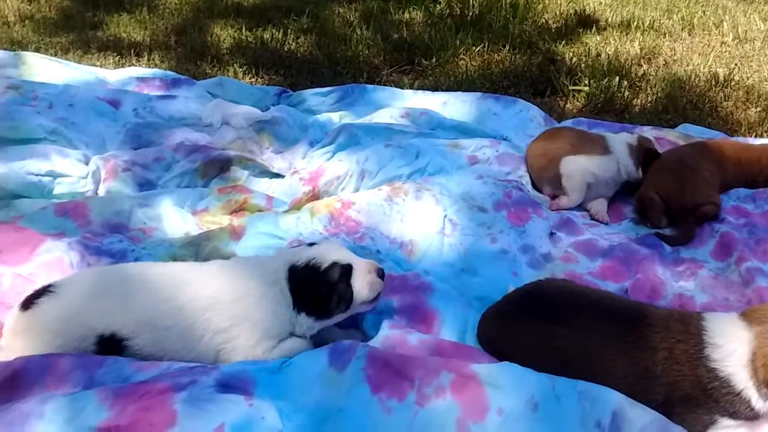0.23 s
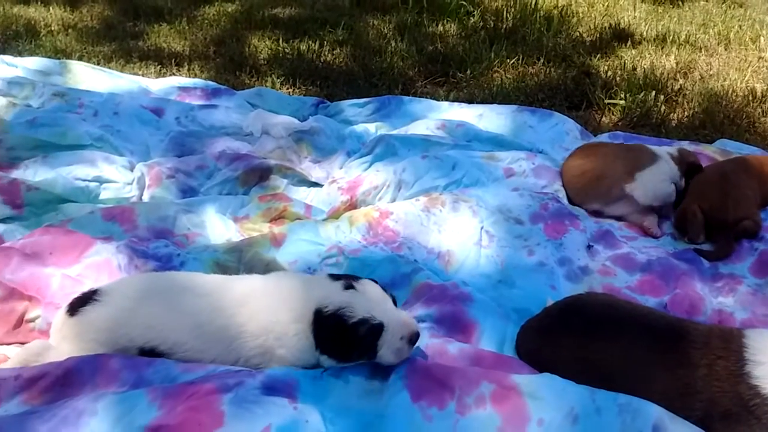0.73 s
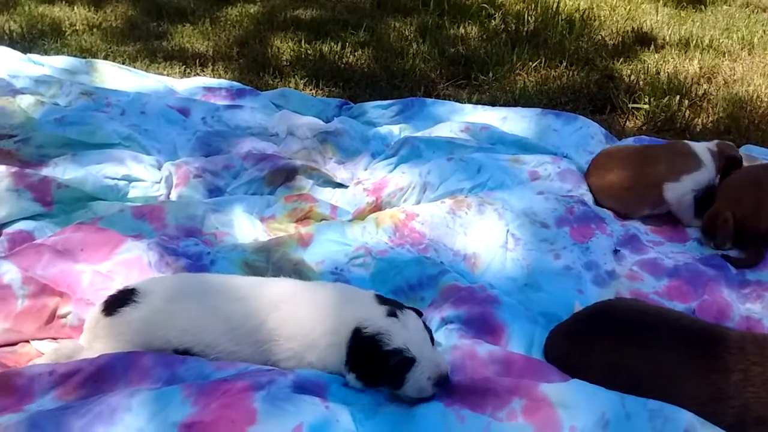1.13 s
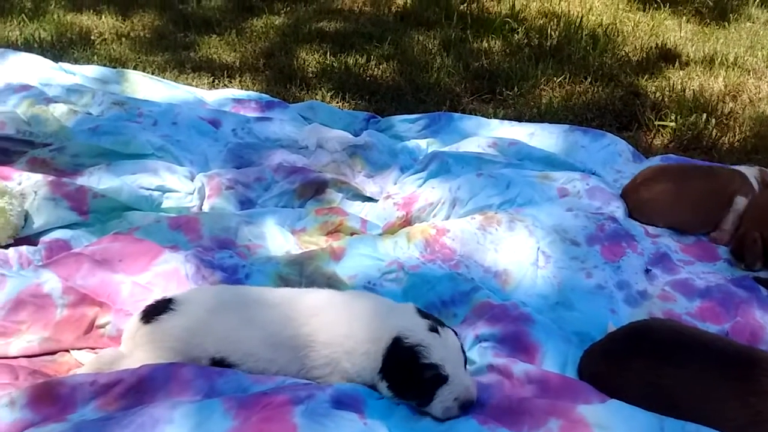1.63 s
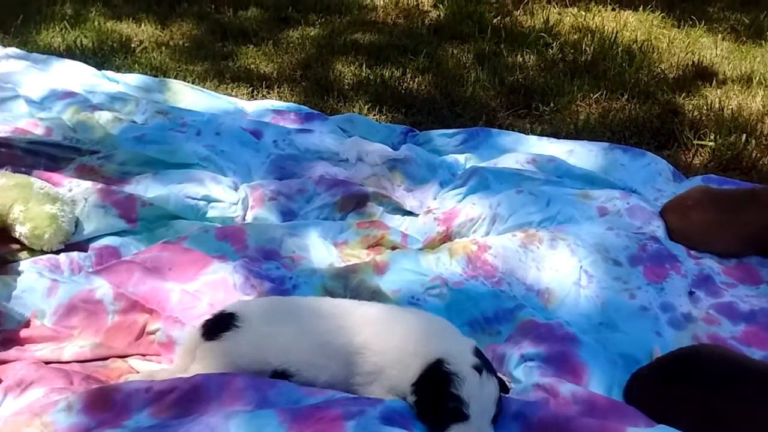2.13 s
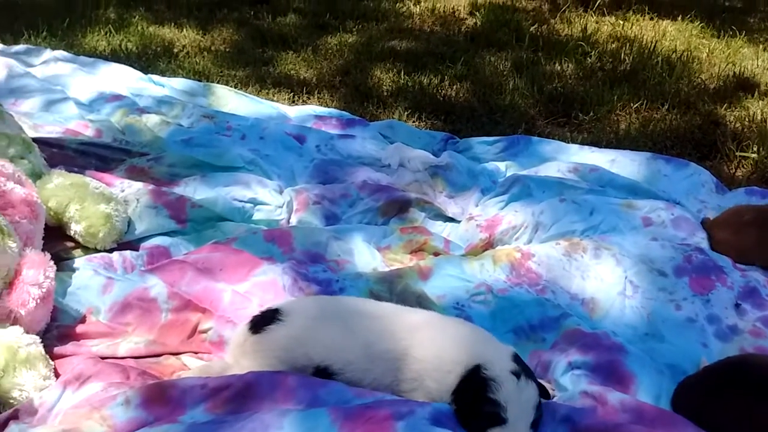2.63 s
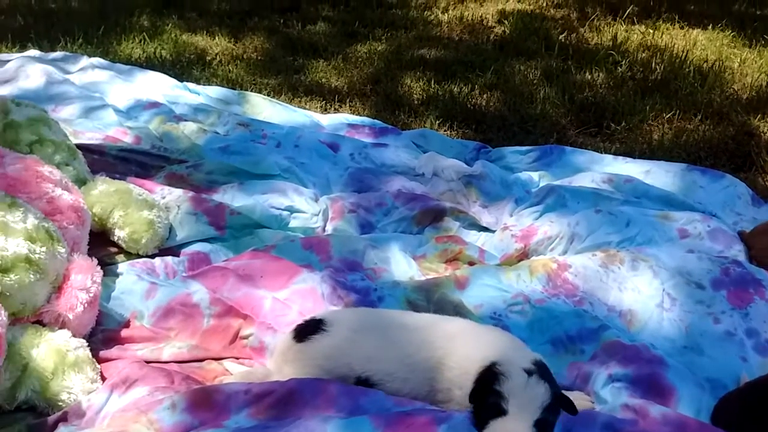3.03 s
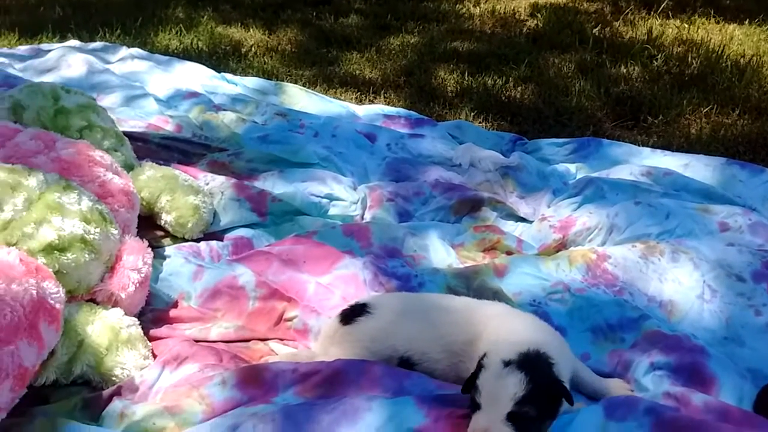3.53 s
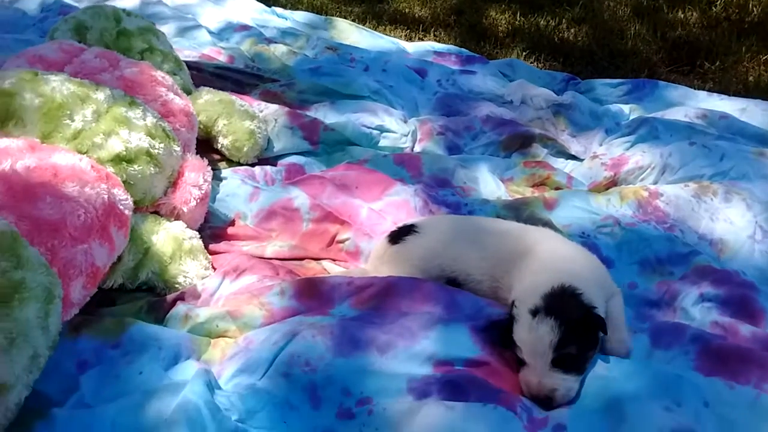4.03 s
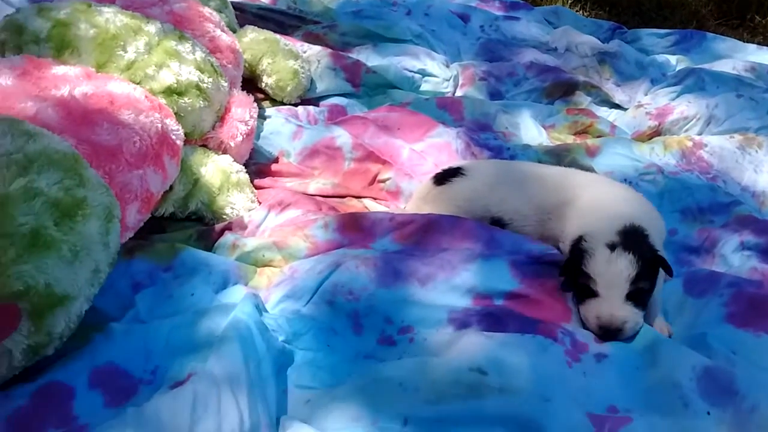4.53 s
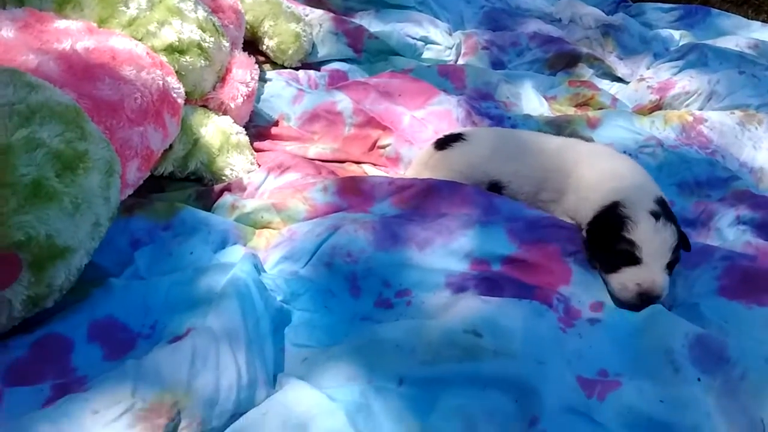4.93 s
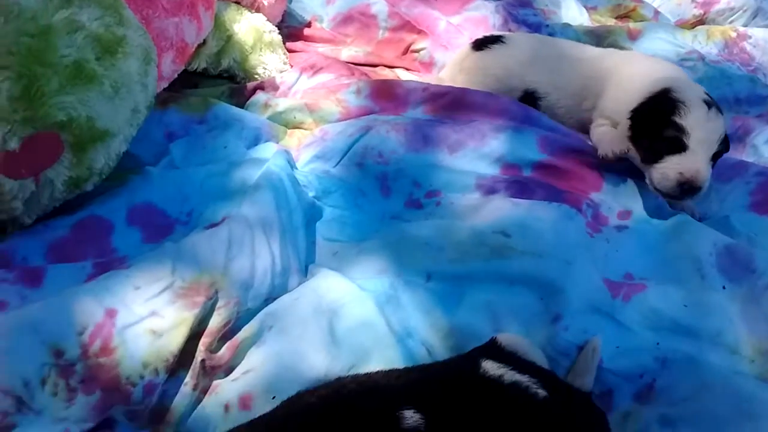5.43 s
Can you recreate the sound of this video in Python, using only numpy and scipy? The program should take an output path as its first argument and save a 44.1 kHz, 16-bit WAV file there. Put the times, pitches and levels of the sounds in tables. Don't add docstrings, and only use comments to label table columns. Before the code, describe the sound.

Overlapping puppy cries in a garden, near and dry with only dull faint echoes. High yelps fade out early; smooth falling howls repeat to the end, joined by yodelling squeals that break in pitch, brief nasal whines, low grunts and a few tiny lip smacks. Soft lumpy wind pushes on the stereo microphone over a quiet leafy hiss.

```python
import sys
import numpy as np
from scipy import signal
from scipy.fft import rfft, irfft, next_fast_len
from scipy.io import wavfile

SR = 44100
rng = np.random.default_rng(int(sys.argv[2]) if len(sys.argv) > 2 else 0)


def decibels_to_gain(level_db):
    exponent = np.asarray(level_db, float) / 20
    return 10 ** exponent


def put_to_file(sound):
    columns = np.atleast_2d(sound).T
    safe = np.clip(columns, -1, 1)
    whole_steps = np.round(safe * 32767)
    wavfile.write(sys.argv[1], SR, whole_steps.astype(np.int16))


N = 250047


def at_hz(points, hz, column=1):
    points = np.array(points, float)
    return np.interp(np.log(np.maximum(hz, 1)), np.log(points[:, 0]), points[:, column])


def coloured(points):
    size = next_fast_len(N)
    gain = decibels_to_gain(at_hz(points, np.fft.rfftfreq(size, 1 / SR)))
    noise = irfft(rfft(rng.standard_normal(size)) * gain, size)[:N]
    return noise / np.std(noise)


def drift(rate_hz):
    low_pass = signal.butter(2, rate_hz, fs=SR, output="sos")
    slow = signal.sosfilt(low_pass, rng.standard_normal(N + SR))[SR:]
    return slow / np.std(slow)


# frequency [Hz], density [dB per Hz].
HISS_COLOUR = [(100, -37.5), (350, -3.5), (1800, 15.5), (6200, -11), (8000, -3.5), (12500, -8),
               (13800, -10.5), (15000, -7)]
HISS_DB = -57.5


def hiss():
    shared = coloured(HISS_COLOUR)
    own = np.array([coloured(HISS_COLOUR), coloured(HISS_COLOUR)])
    balance = decibels_to_gain([[1.5], [-1.5]])
    return decibels_to_gain(HISS_DB + 1.6 * drift(7.6)) * (0.26 * shared + 1.82 * own) * balance


# peak in seconds [s], level [dB].
WIND = [(0.0, -46.5), (1.498, -41), (2.0, -50.5), (4.12, -56.5), (5.551, -45), (0.847, -41.5), (2.298, -34),
        (3.06, -44), (4.449, -49.5), (5.251, -39.5)]
# frequency [Hz], density [dB per Hz].
WIND_COLOUR = [(20, -35.5), (110, -5), (230, -9), (330, -20.5), (700, -2), (8000, -46)]
CALM_DB, GUST_S = -48.5, 0.16


def wind():
    time = np.arange(N) / SR
    gusts = decibels_to_gain(CALM_DB) + sum(decibels_to_gain(db) * np.exp(-((time - s) / GUST_S) ** 2) for s, db in WIND)
    opposite = np.array([[1], [-1]])
    lumpy = gusts * decibels_to_gain(2.4 * drift(4.2)) * coloured(WIND_COLOUR)
    sway = decibels_to_gain(0.89 * drift(2.0) * opposite)
    shared = 0.088 * gusts * coloured(WIND_COLOUR)
    return lumpy * sway * opposite + shared


def garden(x):
    dull = signal.sosfilt(signal.butter(2, 3000, fs=SR, output="sos"), x)
    out = np.zeros_like(x)
    for lag_s, db in [(.017, -27.5), (.043, -28.5)]:
        lag = int(lag_s * SR)
        out[:, lag:] += decibels_to_gain(db) * dull[::-1, :-lag]
    return out


# frequency [Hz], phase by which left leads [rad], left over right [dB].
FRONT = [(336, 3, 1.4), (505, 3.5, -1), (798, 3.5, 8), (813, 5, 17.5), (920, -0.03, 6.5), (1182, 1.45, 6),
         (1678, 0, -2.5), (2196, -2, -6.5), (3260, -2, 2.5), (3300, -2.5, 0.5), (5430, 0.24, 3.5),
         (8900, 0.5, 1), (14900, -6, 0)]
FLANK = [(400, 3.14, 0.5), (815, 3.45, 1.1), (1360, 4, 0.67), (2064, 4.36, 1.9), (3050, 3.26, 3.9),
         (4640, 2.05, 0.89), (15250, 5.94, 2.2)]
BEHIND = [(550, -4.5, -14.5), (820, -1.5, -1.5), (2157, 0.36, 3.5), (3390, 4, 4.5), (3330, 3.5, 6),
          (8000, 9, 2.5), (15000, 11, 2.5)]


def ports(x, direction):
    size = next_fast_len(N + SR // 10)
    hz, spectrum = np.fft.rfftfreq(size, 1 / SR), rfft(x, size)
    turn = np.exp(.5j * at_hz(direction, hz))
    ratio = decibels_to_gain(at_hz(direction, hz, column=2))
    right = np.sqrt(2 / (1 + ratio ** 2))
    return irfft([spectrum * ratio * right * turn, spectrum * right / turn], size)[:, :N]


# frequency [Hz], level [dB].
THROAT = [(250, -46), (400, -23.5), (900, 8.5), (1600, 19), (2050, 13), (2500, 3.5), (3200, 1),
          (4500, -12.5), (5300, -24.5), (6200, -40.5), (7600, -15.5), (8600, -13.5), (9400, -32),
          (10400, -25.5), (13800, -55.5), (15200, -33.5)]
# time in seconds [s], level [dB].
SMACKS = [(1.233, -30), (1.326, -33), (3.047, -40), (3.09, -40), (2.826, -32)]
SMACK_S = .0015


def smacks():
    time = np.arange(N) / SR
    puffs = sum(decibels_to_gain(db) * np.exp(-((time - s) / SMACK_S) ** 2) for s, db in SMACKS)
    return puffs * signal.lfilter([1, -.7], [1], coloured(THROAT)) * 1.8


def glide(t, s, value):
    slope = np.diff(value) / np.diff(s)
    inner = 2 * np.maximum(slope[1:] * slope[:-1], 0) / (slope[1:] + slope[:-1] + 1e-9)
    tangent = np.r_[slope[0], inner, slope[-1]]
    k = np.clip(np.searchsorted(s, t) - 1, 0, len(s) - 2)
    step = np.diff(s)[k]
    u = (t - s[k]) / step
    bend = (1 - u) * (tangent[k] - slope[k]) - u * (tangent[k + 1] - slope[k])
    return value[k] + step * u * (slope[k] + (1 - u) * bend)


THROAT_TOP_DB, MOUTH_RANGE_DB = 22, 42
RING_WIDTH_OCTAVES, DIP_HZ, DIP_WIDTH_OCTAVES = 0.26, 3050, 0.18
RISE_DB_PER_OCTAVE_S, RISE_TOP_DB = 4, 10.5
JUMP_S = .012
OVERTONE_ONSET_S = 0.03
RASP_DB, RASP_HZ = 19, 6800
BREATH_DB, BREAK_BREATH_DB = -34, 22


def puppy(melodies, mouths, hums, breaks, wobble, edge_s, tilt_db, first_db, upper_db, ringing, dip_db):
    time, voice, phase = np.arange(N) / SR, np.zeros(N), [0]
    starts, ends = {m[0][0] for m in melodies}, {m[-1][0] for m in melodies}
    rough = np.zeros(N)
    for a, b, depth in breaks:
        rough += depth * np.clip(np.minimum(time - a, b - time) / 0.0013, 0, 1)
    unsteady = 1 + wobble * drift(45) + .06 * rough * drift(250)
    shimmer = decibels_to_gain(0.5 * drift(45)) * (1 + rough * drift(230))
    breath, flicker = coloured(THROAT), drift(13.0)
    high_pass = signal.butter(4, RASP_HZ, "high", fs=SR, output="sos")
    breath = breath + decibels_to_gain(RASP_DB) * signal.sosfilt(high_pass, breath)
    air = decibels_to_gain(BREATH_DB + BREAK_BREATH_DB * rough) * breath

    for melody, mouth, hum_db in zip(melodies, mouths, hums):
        s, pitch = np.transpose(melody)
        span = slice(int(max(s[0], 0) * SR), min(int(s[-1] * SR), N))
        t = time[span]
        runs_on, continues = s[0] in ends, s[-1] in starts
        melody_hz = glide(t, s, pitch)
        hz = melody_hz * unsteady[span]
        order = np.arange(1, int(15000 / pitch.max()) + 1)[:, None]
        overtone_hz = order * hz

        at, db = np.transpose(mouth)
        open_db = glide(np.clip(t, at[0], at[-1]), at, db) - THROAT_TOP_DB
        octaves = np.maximum(np.log2(overtone_hz / 2000), 0) * (overtone_hz < 6500)
        sample = span.start + np.arange(len(t))
        uneven = 4.8 * flicker[(sample + 5000 * order) % N]
        gains = decibels_to_gain(at_hz(THROAT, overtone_hz) + tilt_db * octaves + uneven * (order > 3) + open_db)

        ring = 0
        for at, reach, ring_hz, db in ringing:
            if s[0] < at < s[-1]:
                away = np.log2(overtone_hz / ring_hz) / RING_WIDTH_OCTAVES
                ring = ring + db * np.exp(-((t - at) / reach) ** 2 - away ** 2)
        dip = dip_db * np.exp(-(np.log2(overtone_hz / DIP_HZ) / DIP_WIDTH_OCTAVES) ** 2)
        gains[1:] *= decibels_to_gain(ring + dip)[1:]

        climb = RISE_DB_PER_OCTAVE_S * np.gradient(np.log2(melody_hz)) * SR
        climb = np.clip(climb, 0, RISE_TOP_DB)
        jumped = any(0 <= s[0] - end < JUMP_S for end in ends)
        onset = np.clip((t - s[0] + jumped) / OVERTONE_ONSET_S, .25, 1)
        gains[2:] *= decibels_to_gain(upper_db + climb / (1 + runs_on)) * onset

        hum = decibels_to_gain(np.linspace(*hum_db, len(t)))
        gains[0] = np.hypot(gains[0] * decibels_to_gain(first_db), hum)
        if runs_on:
            both = min(len(gains), len(last))
            gains[:both] *= (last[:both] / gains[:both, :1]) ** np.exp((s[0] - t) / .015)
        last = gains[:, -1:]

        phase = phase[-1] + np.cumsum(2 * np.pi * hz / SR)
        tone = np.sqrt(2) * np.sum(gains * np.sin(order * phase + order ** 2), axis=0)
        strain = np.minimum(np.abs(np.gradient(np.log(melody_hz))) * SR / 3.5, 1.6)
        effort = np.sqrt(np.sum(gains ** 2, axis=0)) * decibels_to_gain(6.0 * strain)
        fade = np.clip(np.minimum(t - s[0] + runs_on, s[-1] - t + continues) / edge_s, 0, 1)
        voice[span] += fade * (tone * shimmer[span] + effort * air[span])
    return voice


def once(melodies, rows, opening_db_per_s):
    mouths = []
    for melody, (_, _, widest_s, db, closing) in zip(melodies, rows):
        start, end = melody[0][0], melody[-1][0]
        s = np.clip(widest_s, start + .002, end - .002)
        first = db - min(opening_db_per_s * (s - start), MOUTH_RANGE_DB)
        final = db - min(closing * (end - s), MOUTH_RANGE_DB)
        mouths.append([(start, first), (s, db), (end, final)])
    return mouths, [row[:2] for row in rows]


# start in seconds [s], pitch [Hz], length [s], level [dB].
GRUNTS = [
    (1.883, 386, 0.028, -29),
    (2.088, 369, 0.061, -35.5),
    (2.289, 320, 0.038, -32),
    (2.706, 300, 0.024, -40.5),
]


def grunts():
    time, out = np.arange(N) / SR, np.zeros(N)
    for s, hz, length, db in GRUNTS:
        swell = np.cos(np.pi * np.clip((time - s) / length, -.5, .5))
        tone = np.sin(2 * np.pi * hz * time) + 0.48 * np.sin(4 * np.pi * hz * time)
        out += decibels_to_gain(db + 10.0) * swell * tone
    return out


# time in seconds [s], pitch [Hz].
WHINER_PITCH = [
    [(0.0, 930), (0.05, 870), (0.088, 955), (0.1, 870)],
    [(0.05, 690), (0.08, 842), (0.14, 1130), (0.175, 1542), (0.205, 1419), (0.262, 1325), (0.289, 1142),
     (0.404, 916), (0.826, 874)],
    [(0.36, 782), (0.4, 960), (0.43, 926), (0.462, 1086), (0.545, 1035)],
    [(0.545, 1035), (0.577, 1153), (0.609, 1117), (0.632, 979), (0.677, 967), (0.702, 1040), (0.727, 746)],
    [(0.92, 726), (0.947, 795), (0.975, 1140), (1.042, 1290), (1.164, 1076), (1.197, 1092), (1.217, 903)],
]
# time in seconds [s], harmonic at the throat's peak [dB].
WHINER_MOUTH = [
    [(0, -21), (.1, -29)],
    [(.05, -30), (.13, -17), (.17, -8.5), (.282, -20.5), (.429, -22.5), (.579, -56), (.826, -61)],
    [(.36, -34), (.369, -6), (.382, -4), (.393, -14.5), (.405, -4.5), (.435, -8.5), (.467, -27),
     (.545, -26)],
    [(.545, -23.5), (.605, -10), (.625, -7.5), (.7, -12.5), (.727, -26.5)],
    [(.92, -25.5), (.942, -12.5), (.98, 1.5), (1.05, 1.5), (1.075, -12), (1.188, -31), (1.2, -23.5),
     (1.217, -31)],
]
# level at start [dB], level at end [dB].
WHINER_HUM = [(-26, -27), (-39.5, -42.5), (-35, -25), (-28.5, -32), (-35, -33.5)]
# start in seconds [s], end in seconds [s], roughness [0-1].
WHINER_BREAKS = [(.085, .1, .2), (.155, .205, .4), (.555, .561, .6), (.715, .727, .2), (.92, .945, .1)]
# time in seconds [s], reach [s], resonance [Hz], swell or hollow [dB].
WHINER_RING = [(.03, 0.079, 7300, -1.5), (0.096, 0.051, 4140, 19), (1.03, 0.039, 3000, 2.5),
               (.96, 0.043, 3900, -13), (0.2, 0.04, 5100, -21), (0.13, 0.042, 5110, 24.5),
               (0.3, 0.18, 4400, 30), (0.68, .03, 910, 12), (0.64, 0.02, 3600, -12),
               (.17, 0.017, 5500, -12), (1, 0.13, 6900, 21.5), (.65, 0.061, 3000, -11),
               (.55, 0.13, 1040, -2), (1.0, 0.035, 2600, 0.5), (1.161, 0.086, 3890, 27.5)]


def whiner():
    return puppy(WHINER_PITCH, WHINER_MOUTH, WHINER_HUM, WHINER_BREAKS, wobble=.005, edge_s=0.0013,
                 tilt_db=-2.5, first_db=-10.0, upper_db=-8.0, ringing=WHINER_RING, dip_db=2)


# time in seconds [s], pitch [Hz].
YODELLER_PITCH = [
    [(1.65, 631), (1.71, 825), (1.782, 1023), (1.83, 971), (1.855, 994)],
    [(2.1, 694), (2.167, 769), (2.205, 900)],
    [(2.205, 900), (2.227, 958), (2.285, 928)],
    [(2.285, 1050), (2.298, 1326), (2.315, 1236)],
    [(2.315, 918), (2.335, 807), (2.4, 596), (2.44, 713), (2.46, 785)],
    [(2.65, 744), (2.682, 886), (2.732, 953), (2.77, 1117)],
    [(2.778, 1624), (2.838, 1445), (2.898, 1330), (2.918, 1230), (2.93, 1150)],
    [(3.12, 615), (3.165, 891), (3.197, 975), (3.232, 1140), (3.265, 1144)],
    [(3.27, 1564), (3.382, 1406), (3.46, 1380)],
    [(3.73, 570), (3.775, 834), (3.816, 938), (3.85, 1058), (4.064, 1005), (4.087, 1020)],
    [(4.092, 495), (4.135, 482), (4.177, 468)],
    [(4.18, 936), (4.245, 902), (4.325, 846), (4.357, 880), (4.373, 790)],
    [(4.54, 596), (4.592, 824), (4.615, 932), (4.695, 1024), (4.708, 1085)],
    [(4.71, 1490), (4.716, 1540), (4.74, 1440), (4.84, 1217)],
    [(4.84, 832), (4.885, 680), (4.94, 774)],
]
# hum at start [dB], hum at end [dB],
# widest at seconds [s], widest level [dB], closing speed [dB per s].
YODELLER = [(-18, -24.5, 1.81, -20.5, 13), (-32, -25.5, 1.3, -36, 12), (-16, -26.5, 2.27, -13.5, 12),
            (-24.5, -28.5, 0.78, -6.5, 110), (-34, -38, 2.32, -21, 240), (-27, -30.5, 2.73, -10, 13),
            (-7.5, -36.5, 2.5, -12.5, 24), (-29, -32.5, 3.255, -3, 12.6), (-16, -36, 3.28, -9.5, 27),
            (-34, -23.5, 3.858, -8.5, 25), (-38, -38, 4.1, -14, 88), (-19, -23.5, 4.19, -16.5, 61),
            (-29.5, -19, 4.69, -10.5, 670), (-21, -29, 3.1, -12.5, 7.9), (-53, -33, 4.85, -19, 250)]
# start in seconds [s], end in seconds [s], roughness [0-1].
YODEL_BREAKS = [(2.283, 2.318, .6), (2.318, 2.35, .28), (2.905, 2.93, .4), (4.27, 4.275, .4),
                (2.35, 2.4, .7), (1.65, 1.86, .2), (2.78, 2.83, .12), (2.65, 2.7, .22), (3.225, 3.245, .15),
                (4.09, 4.137, .42), (3.896, 3.903, .4), (4.53, 4.565, .5), (2.7, 2.77, .06),
                (3.16, 3.225, .05), (4.173, 4.182, .5), (4.705, 4.72, .3)]
# time in seconds [s], reach [s], resonance [Hz], swell or hollow [dB].
YODELLER_RING = [(2.26, 0.032, 2850, 15.5), (2.33, 0.013, 1780, 10), (2.66, 0.028, 2900, -17),
                 (3.1, 0.1, 2500, -13.5), (2.75, 0.067, 2940, 12), (2.4, 0.033, 7500, 11),
                 (3.21, 0.055, 5200, 12.5), (3.7, 0.22, 3700, 12), (4.005, 0.081, 4700, -18),
                 (3.8, 0.046, 2900, 10.5), (2.74, 0.098, 1100, -10.5), (4.14, 0.14, 1470, 8),
                 (2.86, 0.049, 3200, -15), (2.92, 0.015, 3500, 8), (3.15, 0.041, 1600, -13.5),
                 (3.845, 0.023, 4100, -10), (3.84, 0.019, 2300, -4.5), (7.9, 0.03, 4600, -4),
                 (5.9, 0.063, 3100, -6), (4.33, 0.055, 1750, 8), (2.3, 0.024, 2000, -5.5),
                 (3.2, 0.076, 2900, 8), (4.64, 0.045, 3900, 19.5), (6.3, 0.049, 2600, 5.5),
                 (4.2, 0.029, 4460, 8.5), (4.8, 0.033, 4000, 7.5), (2.33, .05, 5200, -8),
                 (2.34, .04, 2400, -11.5), (1.6, .05, 6500, -14), (3.8, 0.048, 4000, -11.5)]


def yodeller():
    mouths, hums = once(YODELLER_PITCH, YODELLER, opening_db_per_s=138.0)
    return puppy(YODELLER_PITCH, mouths, hums, YODEL_BREAKS, wobble=0.0036, edge_s=0.0019,
                 tilt_db=1.0, first_db=-25, upper_db=-4.5, ringing=YODELLER_RING, dip_db=-5.5)


# time in seconds [s], pitch [Hz].
NEIGHBOUR_PITCH = [
    [(1.38, 687), (1.422, 581), (1.48, 519)],
    [(2.15, 755), (2.207, 758), (2.24, 625)],
    [(2.52, 870), (2.615, 890)],
    [(2.87, 517), (2.92, 750), (2.95, 868), (3.007, 905), (3.015, 860), (3.036, 850)],
    [(3.255, 640), (3.287, 772), (3.372, 720), (3.43, 694)],
    [(3.46, 906), (3.502, 906), (3.547, 814), (3.57, 832), (3.6, 728), (3.63, 737)],
    [(4.29, 610), (4.335, 695), (4.41, 665), (4.43, 619)],
    [(5.16, 469), (5.202, 700)],
    [(5.202, 700), (5.225, 790), (5.26, 864), (5.325, 836), (5.395, 708)],
    [(5.395, 708), (5.525, 718), (5.565, 662), (5.64, 648), (5.664, 744)],
    [(5.47, 677), (5.525, 905), (5.6, 1055), (5.665, 1085)],
]
# hum at start [dB], hum at end [dB],
# widest at seconds [s], widest level [dB], closing speed [dB per s].
NEIGHBOUR = [(-45, -39, 1.6, -21.5, 29.5), (-31, -32.5, 0.83, -31, 19), (-36.5, -38.5, 7.8, -31.5, 14),
             (-39, -28, 2.7, -32.5, 44), (-28.5, -33, 2.4, -36.5, 109), (-51, -41.5, 3.62, -20, 22),
             (-41.5, -38, 4.34, -35, 20), (-48, -32.5, 5.18, -20.5, 97), (-43, -52, 5.212, -0.5, 91),
             (-53, -43, 5.41, -30.5, 15), (-37.5, -36.5, 5.49, -33, -5)]
# start in seconds [s], end in seconds [s], roughness [0-1].
NEIGHBOUR_BREAKS = [(3.53, 3.585, .35), (5.16, 5.19, .15), (1.38, 1.48, .2), (4.41, 4.425, .4)]
# time in seconds [s], reach [s], resonance [Hz], swell or hollow [dB].
NEIGHBOUR_RING = [(5.22, 0.058, 4670, 12), (5.46, 0.56, 4880, 20), (5.3, 0.058, 6200, 12),
                  (5.28, 0.11, 760, 0), (5.33, 0.54, 2010, -18), (2.98, 0.055, 2700, 28),
                  (2.95, .1, 4800, -15), (2.95, .1, 4100, -15), (5.39, 0.042, 1450, -7.5),
                  (3.6, .05, 1400, 1.5), (5.46, 0.28, 1850, 14.5), (2.22, 0.07, 1700, -1)]


def neighbour():
    mouths, hums = once(NEIGHBOUR_PITCH, NEIGHBOUR, opening_db_per_s=400.5)
    return puppy(NEIGHBOUR_PITCH, mouths, hums, NEIGHBOUR_BREAKS, wobble=0.0044, edge_s=0.0056,
                 tilt_db=0.5, first_db=-23, upper_db=-9.0, ringing=NEIGHBOUR_RING, dip_db=-26.5)


# time in seconds [s], pitch [Hz].
HOWLER_PITCH = [
    [(0.14, 378), (0.187, 650), (0.225, 808), (0.27, 758), (0.347, 702), (0.387, 643), (0.848, 569),
     (0.958, 461), (1.048, 420)],
    [(1.1, 345), (1.17, 312), (1.22, 318), (1.28, 345), (1.322, 465)],
    [(1.322, 465), (1.369, 598), (1.405, 752), (1.445, 757), (1.5, 625), (1.58, 532), (1.604, 527)],
    [(1.604, 527), (1.67, 565), (1.77, 742), (1.868, 731), (1.975, 612), (2.063, 556), (2.13, 517),
     (2.168, 573)],
    [(2.395, 433), (2.45, 749), (2.48, 848), (2.512, 862), (2.542, 780), (2.712, 799), (2.825, 753),
     (3.004, 650), (3.176, 465)],
    [(3.39, 405), (3.445, 711), (3.492, 830), (3.597, 740), (3.809, 631), (3.869, 675), (3.979, 658),
     (4.201, 478), (4.308, 423)],
    [(4.56, 393), (4.625, 681), (4.68, 785), (4.72, 735), (4.78, 620), (4.874, 569)],
    [(4.874, 569), (4.91, 582), (4.944, 626), (4.999, 766), (5.114, 827), (5.156, 775), (5.211, 714),
     (5.303, 569), (5.458, 458)],
]
# time in seconds [s], harmonic at the throat's peak [dB].
HOWLER_MOUTH = [
    [(.14, -25.5), (.167, -19.5), (.2, -15), (.25, -4.5), (.285, -26.5), (.345, -16), (.4, -23.5),
     (.46, -27.5), (1.048, -27.5)],
    [(1.1, -78), (1.22, -53), (1.322, -41)],
    [(1.322, -23.5), (1.355, -20.5), (1.372, -9), (1.39, -10.5), (1.445, -7.5), (1.49, -21.5),
     (1.53, -19.5), (1.604, -25)],
    [(1.604, -23.5), (1.69, -15), (1.79, -8.5), (1.85, -11), (1.97, -12.5), (2.135, -17), (2.168, -32)],
    [(2.395, -22.5), (2.432, -14.5), (2.442, -14.5), (2.52, -4), (2.537, -20.5), (2.627, -15.5),
     (2.685, -30.5), (2.725, -12.5), (2.94, -32.5), (3.176, -23.5)],
    [(3.39, -36), (3.43, -16.5), (3.47, -11.5), (3.515, -6.5), (3.532, -26), (3.65, -33), (3.84, -31),
     (4.2, -26), (4.308, -44.5)],
    [(4.56, -29), (4.61, -16.5), (4.63, -17), (4.68, -11.5), (4.71, -15.5), (4.784, -25), (4.874, -23.5)],
    [(4.874, -29.5), (4.98, -16.5), (5.04, -19.5), (5.086, -26), (5.115, -13), (5.155, -10.5), (5.172, -26),
     (5.21, -25.5), (5.458, -31.5)],
]
# level at start [dB], level at end [dB].
HOWLER_HUM = [(-34, -28), (-59, -38), (-27.5, -30.5), (-28, -27.5), (-31.5, -31), (-31.5, -29.5),
              (-27.5, -34.5), (-24.5, -34)]
# start in seconds [s], end in seconds [s], roughness [0-1].
HOWLER_BREAKS = [(1.2, 1.33, .3), (1.33, 1.38, .16), (2.12, 2.17, .2), (5.06, 5.095, .15), (.14, .19, .17),
                 (2.39, 2.435, .2), (3.39, 3.425, .2), (4.56, 4.6, .18)]
# time in seconds [s], reach [s], resonance [Hz], swell or hollow [dB].
HOWLER_RING = [(.21, 0.11, 2400, 6.5), (.8, 0.092, 1610, 8), (1.37, 0.014, 1984, 5),
               (1.42, 0.055, 2504, 16.5), (1.42, 0.03, 4930, 12), (1.56, 0.13, 1700, 10.5),
               (1.7, 0.22, 1845, 10), (1.85, 0.11, 3180, 3.5), (2.03, 0.15, 1764, 9),
               (2.03, 0.14, 1030, -10), (2.13, .03, 2277, 13), (2.43, 0.038, 2145, 11),
               (2.48, 0.034, 2570, 14), (2.48, .06, 4980, -0.5), (3.05, 0.046, 1770, 2.5),
               (3.43, 0.1, 1980, 4), (3.48, 0.03, 2290, 13), (2.62, .04, 2440, -4), (2.8, 0.1, 2370, -5.5),
               (3.48, .06, 5200, -12), (4.0, 0.43, 1150, 7), (4.66, 0.057, 2510, 13), (4.8, 0.13, 1810, 11),
               (4.745, .022, 2130, -16.5), (4.93, 0.16, 1624, 10.5), (5.05, 0.81, 3640, -9),
               (5.33, 0.15, 1140, 3), (5.33, 0.14, 2070, -21)]


def howler():
    return puppy(HOWLER_PITCH, HOWLER_MOUTH, HOWLER_HUM, HOWLER_BREAKS, wobble=0.00368, edge_s=0.0071,
                 tilt_db=-4.5, first_db=-22.5, upper_db=-5.5, ringing=HOWLER_RING, dip_db=-0.7)


def scene():
    behind = ports(whiner(), BEHIND)
    flank = ports(yodeller() + grunts(), FLANK)
    front = ports(neighbour() + howler(), FRONT)
    litter = front + flank + behind
    return hiss() + wind() + garden(litter) + ports(smacks(), FRONT) + litter


def band_limit(x):
    return signal.sosfilt(signal.butter(12, 15680, fs=SR, output="sos"), x)


NOTCH_HZ, NOTCH_Q, NOTCH_SHARE = 6480, 13, 0.46


def record(dry):
    soft = 1.086 * dry / (1 + dry ** 6) ** (1 / 6)
    band = signal.lfilter(*signal.iirpeak(NOTCH_HZ, NOTCH_Q, SR), soft)
    mix = soft - NOTCH_SHARE * band
    return band_limit(mix)


dry = scene()
out = record(dry)
put_to_file(out)
```